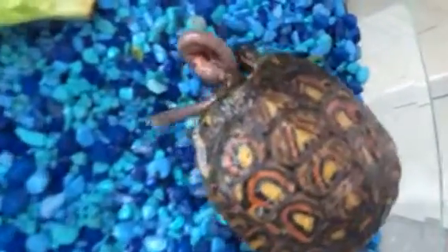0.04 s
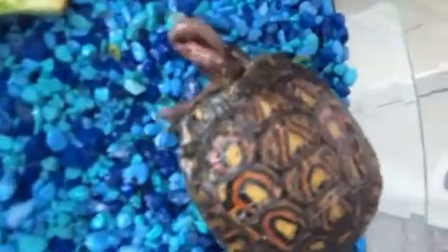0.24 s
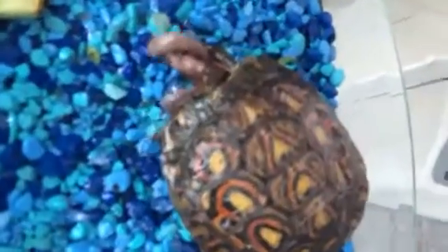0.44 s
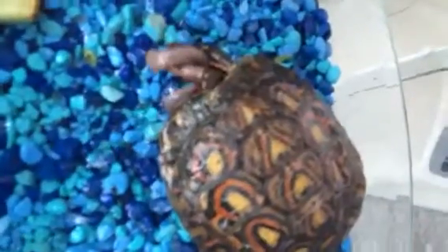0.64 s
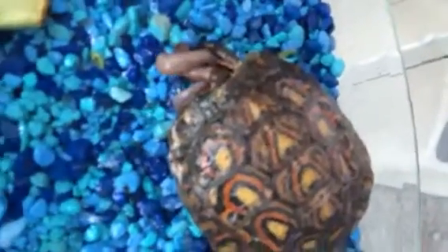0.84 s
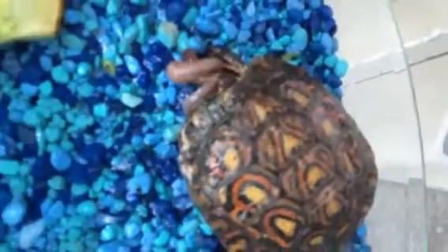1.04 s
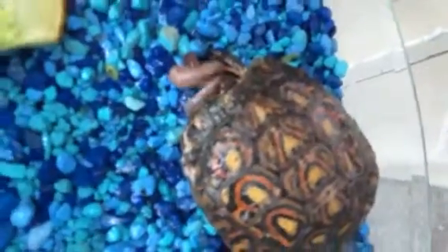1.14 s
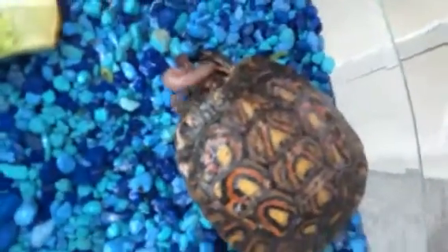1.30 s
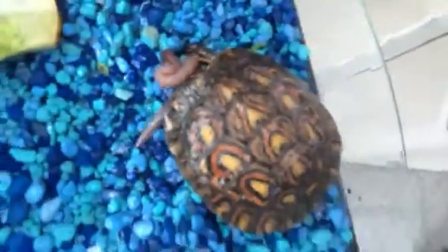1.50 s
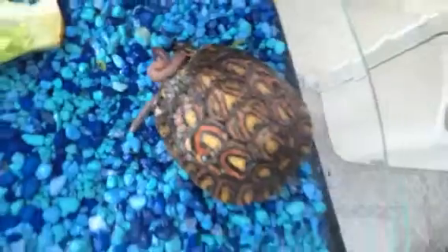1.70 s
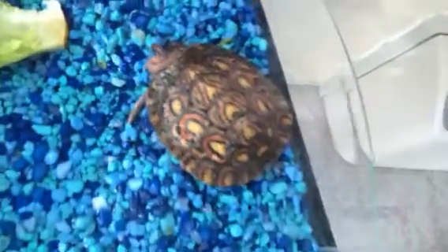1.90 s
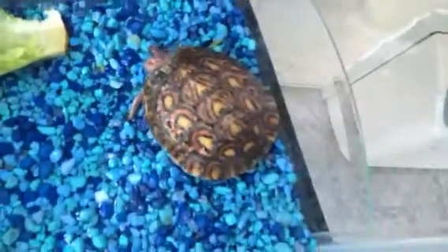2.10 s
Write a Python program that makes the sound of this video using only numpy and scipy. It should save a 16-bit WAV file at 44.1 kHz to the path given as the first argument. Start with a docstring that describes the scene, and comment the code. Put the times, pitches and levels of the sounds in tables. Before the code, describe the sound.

Gravel crunching and clicking under a turtle, with one hollow thump on a plastic tub.

```python
"""Turtle on gravel in a plastic tub

A turtle shifts on aquarium gravel while it tugs at a worm, heard from close by. Pebbles slide and click
in short crunches that excite the tub's walls. One strong impact of the shell, among a few faint ones,
sets the tub's low modes ringing like a drum. Soft swells of noise give a low opening ring of the tub,
faint rubs and hiss, and a late low thump, over the low rumble and faint hiss of a quiet room."""
import sys
import numpy as np
from scipy import signal
from scipy.fft import rfft, irfft
from scipy.io import wavfile

SR = 44100
rng = np.random.default_rng(int(sys.argv[2]) if len(sys.argv) > 2 else 0)


def log_audio(samples):
    """Write samples as a 16-bit WAV file to the path given in sys.argv[1]."""
    # one column per channel
    frames = np.atleast_2d(samples).T
    # limit to full scale, then quantise
    limited = np.clip(frames, -1, 1)
    pcm = np.round(limited * 32767).astype(np.int16)
    wavfile.write(sys.argv[1], SR, pcm)


N = 94815


def undb(db):
    """Amplitude ratio of a level in decibels."""
    return 10 ** (np.asarray(db) / 20)


def unit(x):
    """Normalisation to rms 1."""
    return x / np.sqrt(np.mean(x ** 2) + 1e-30)


def fade(t, t60):
    """Exponential damping from t = 0, by 60 dB in t60 seconds."""
    return (t >= 0) * np.exp(-np.log(1000) * np.maximum(t, 0) / t60)


def colour(x, points, tilt_db=0):
    """Spectral shaping by (frequency [Hz], level [dB]) points and a tilt per octave."""
    octave = np.log2(np.maximum(np.fft.rfftfreq(len(x), 1 / SR), 1))
    hz, db = np.array(points).T
    slope = tilt_db * np.maximum(octave - np.log2(hz[0]), 0)
    return irfft(rfft(x) * undb(np.interp(octave, np.log2(hz), db) + slope), len(x))


def band(size, hz, width):
    """Resonance driven by white noise, at rms 1."""
    detuning = 2 * (np.fft.rfftfreq(size, 1 / SR) - hz) / width
    return unit(irfft(rfft(rng.standard_normal(size)) / (1 + detuning ** 2), size))


def burst(x, envelope):
    """Amplitude modulation in which the envelope alone sets the energy."""
    return unit(x * envelope) * np.sqrt(np.mean(envelope ** 2))


def add(out, start, x):
    """Superposition of a short sound at its start time."""
    i = max(int(start * SR), 0)
    out[i:i + len(x)] += x[:max(N - i, 0)]


# spectrum of the room's rumble and hiss (frequency [Hz], relative density [dB])
ROOM_SPECTRUM = [(20, -34), (40, -7), (68, 2), (95, -2), (150, -3), (280, -8), (345, -16.5), (450, -25),
                 (720, -33.5), (1030, -26.5), (1300, -31.5), (1750, -30), (2700, -36), (4000, -35.5),
                 (7000, -39), (15000, -48.5)]
# drones in the room (frequency [Hz], bandwidth [Hz], level [dB])
ROOM_DRONES = [(120.64, 5.6, -58), (206.5, 12, -68), (250, 32, -67), (284.8, 14, -63.5), (520.3, 39, -74.5)]
def room():
    """Stationary noise: a broad rumble and faint hiss, with a few narrow droning bands."""
    air = undb(-52.5) * unit(colour(rng.standard_normal(N), ROOM_SPECTRUM))
    return air + sum(undb(db) * band(N, hz, width) for hz, width, db in ROOM_DRONES)


# soft swells of band noise (time [s], duration [s], frequency [Hz], bandwidth [Hz], level [dB])
NOISE_SWELLS = [(-0.03, 0.1, 267.3, 75, -41.5), (0.338, 0.082, 208, 60, -45.5),
                (0.344, 0.081, 508, 24, -50.5), (0.766, 0.11, 189, 134, -53), (0.776, 0.5, 6600, 5300, -71),
                (1.16, 0.15, 4470, 1200, -71), (1.267, 0.57, 1045, 88, -72.5),
                (1.503, .09, 5400, 900, -75.5), (1.916, 0.039, 110, 110, -52.5)]
def swells():
    """Modulated band noise: a low opening ring of the tub, faint rubs and hiss, and a late low thump."""
    t, out = np.arange(N) / SR, np.zeros(N)
    for start, length, hz, width, db in NOISE_SWELLS:
        swell = np.sin(np.pi * np.clip((t - start) / length, 0, 1))
        out += undb(db) * swell * band(N, hz, width)
    return out


# spectrum of grinding pebbles (frequency [Hz], relative density [dB])
GRIND_SPECTRUM = [(100, -9.5), (400, 1.5), (700, -6.5), (1000, 4.5), (1450, -4), (2000, 4), (2800, -5),
                  (3600, -2), (6000, 0.5), (8000, -1.5), (11000, -3), (15000, 2)]
# gravel sliding under feet and shell
# (time [s], rise time [s], time to release [s], level [dB], tilt [dB/octave], treble cutoff [Hz])
GRAVEL_SLIDES = [(0.0, 0.00067, .027, -47, 4, 14200), (0.097, 0.0025, 0.02, -53.5, -3.5, 9200),
                 (0.144, 0.0023, 0.035, -55.5, 1, 2780), (0.183, 0.0025, 0.014, -46.5, -3, 12900),
                 (0.205, 0.0019, 0.044, -50, -4.5, 13000), (0.247, 0.0034, 0.022, -49.5, -2, 12000),
                 (0.303, 0.015, 0.073, -57.5, -2.5, 9000), (0.361, 0.0025, 0.023, -55.5, -2.8, 11000),
                 (0.528, 0.0033, 0.037, -59, -4.5, 13000), (0.5404, 0.0009, 0.026, -53, -1.7, 11800),
                 (0.599, 0.0024, 0.019, -54.5, -3, 13000), (0.641, 0.0051, 0.052, -60, -1, 6500),
                 (0.694, 0.0024, 0.039, -46, 1, 6050), (0.741, 0.0023, 0.0099, -52, 1.5, 6440),
                 (1.933, 0.0084, 0.14, -61.5, -1.3, 10100), (2.034, 0.012, 0.049, -42.5, 0.5, 9300),
                 (2.075, 0.013, 0.057, -55.5, 1.8, 9000)]
def slides():
    """Shot noise: grinding pebbles make many tiny random contacts, each smeared by the close walls."""
    contacts_per_s, spread_db = 3000, 3.5
    smear_t60_s, release_s = 0.013, 0.005
    t, out = np.arange(SR // 5) / SR, np.zeros(N)
    for start, rise, length, db, tilt_db, cutoff_hz in GRAVEL_SLIDES:
        contacts = rng.random(len(t)) < contacts_per_s / SR
        strength = undb(spread_db * np.minimum(rng.exponential(size=len(t)), 3))
        # incoherent contacts add in power
        power = signal.fftconvolve((contacts * strength) ** 2, fade(t, smear_t60_s) ** 2)[:len(t)]
        grains = np.sqrt(np.abs(power)) * rng.standard_normal(len(t))
        grains = colour(grains, GRIND_SPECTRUM, tilt_db)
        grains = signal.sosfilt(signal.butter(2, cutoff_hz, fs=SR, output="sos"), grains)
        effort = np.minimum(t / rise, 1) * np.exp(-np.maximum(t - length, 0) / release_s)
        add(out, start, undb(db) * burst(grains, effort))
    return out


# spectrum of stone striking stone (frequency [Hz], relative density [dB])
STONE_SPECTRUM = [(100, -5.5), (400, 7.5), (700, -9.5), (1000, -2), (1450, 0.5), (2000, 11), (2800, -3),
                  (4000, 2.5), (6000, 7), (8000, 0.5), (11000, -3.5), (15000, -4.5)]
# pebble impacts (time [s], level [dB], ring frequency [Hz], relative ring level [dB], tilt [dB/octave])
PEBBLE_CLICKS = [(0.003, -34, 13500, -15, 30), (0.0142, -43.5, 10000, 5, -18),
                 (0.0628, -52.5, 990, 2, -5.5), (0.096, -45, 14500, -8.5, -3.5),
                 (0.1353, -46, 9400, -18, -0.5), (0.1678, -45.5, 4930, -7, -1.5),
                 (0.198, -48.5, 7850, 4, 24), (0.2021, -31.5, 3520, -11, -4.5), (0.2115, -47, 12700, -4, 6),
                 (0.2448, -29.5, 5800, -6, -10), (0.2519, -35.5, 9900, -2.5, 9),
                 (0.2891, -37, 5650, -31, 3), (0.3027, -33, 5630, 2.5, 0.3), (0.34, -36.5, 7800, -23, -6.5),
                 (0.367, -41.5, 2120, -2, -3), (0.5237, -53, 9000, -11, -2), (0.5956, -48.5, 11400, -4, 1),
                 (0.613, -46, 8000, -5, -13), (0.640, -36.5, 6030, -0.5, -0.1),
                 (0.6964, -42.5, 1790, -2.5, -3.5), (0.724, -44.5, 7900, -4, -26),
                 (0.7475, -46, 8000, -16, -1), (0.9228, -52, 2240, -17, -2), (1.9376, -52, 2000, -8, -4),
                 (2.011, -42.5, 4040, -1.5, 5.5), (2.041, -47.5, 7500, 8.5, 14), (2.06, -43, 6300, -10, 4),
                 (2.098, -57, 5360, 9, -5)]
def clicks():
    """Hard impact: a slipping pebble strikes its neighbours with a broadband crack and a damped ring."""
    t, out = np.arange(SR // 10) / SR, np.zeros(N)
    attack = np.minimum(t / 0.001, 1)
    for start, db, hz, ring_db, tilt_db in PEBBLE_CLICKS:
        stone = colour(rng.standard_normal(len(t)), STONE_SPECTRUM, tilt_db)
        crack = burst(stone, attack * fade(t, t60=0.026))
        ring = burst(band(len(t), hz, width=0.22 * hz), attack * fade(t, t60=0.024))
        add(out, start, undb(db) * (crack + undb(ring_db) * ring))
    return out


# modes of the tub's walls (frequency [Hz], relative level [dB], decay time T60 [s])
WALL_MODES = [(259.5, 3.5, 0.067), (530, 3, 0.28), (953, -3, 0.083), (1146, -3.5, 0.02), (1315, -0.5, 0.16),
              (1769, 0, 0.1), (1923, -2, 0.053), (2125, -3.5, 0.13), (3595, 2, 0.041)]
def enclosure(gravel):
    """Forced vibration and reverberation: the gravel rings the walls, and a short echo follows."""
    walls_db, echo_db = -19, -19
    t = np.arange(SR // 2) / SR
    walls = sum(undb(db) * unit(np.sin(2 * np.pi * hz * t) * fade(t, t60)) for hz, db, t60 in WALL_MODES)
    echo = unit(rng.standard_normal(len(t)) * fade(t, t60=0.25))
    impulse_response = (undb(walls_db) * walls + undb(echo_db) * echo) / np.sqrt(len(t))
    return gravel + signal.fftconvolve(gravel, impulse_response)[:N]


# low modes of the tub's floor (frequency [Hz], relative level [dB], decay time T60 [s])
FLOOR_MODES = [(149, -29, 0.11), (213, -8.5, 0.21), (253.8, -23.5, 0.5), (375, -24, 0.085),
               (524.7, -25.5, 0.089)]
# knocks of the shell on the tub (time [s], gain [dB])
SHELL_KNOCKS = [(0.1917, -29), (0.2026, -1.5), (0.338, -26), (0.727, -32), (2.054, -31)]
def knocks():
    """Free vibration after impact: the shell makes a dull thud, then the floor's modes boom and beat."""
    push_s = 0.00165
    t, out = np.arange(SR) / SR, np.zeros(N)
    # successive modes start in opposite phase
    modes = sum(-(-1) ** k * undb(db) * np.sin(2 * np.pi * hz * t) * fade(t, t60)
                for k, (hz, db, t60) in enumerate(FLOOR_MODES))
    boom = modes * (1 - np.exp(-t / push_s))
    thud = undb(-28) * band(SR, hz=1050, width=730) * fade(t, t60=0.023)
    for start, db in SHELL_KNOCKS:
        add(out, start, undb(db) * (boom + thud))
    return out


def scene():
    """Superposition: knocks, gravel, soft swells and room add at one microphone."""
    return (knocks() + enclosure(clicks() + slides()) + swells() + room())[None]


def record(dry):
    """Band limiting: the small microphone loses the deep bass, and the recorder cuts the top."""
    low_hz, top_hz = 52.7, 15100
    microphone = signal.butter(2, low_hz, "high", fs=SR, output="sos")
    recorder = signal.ellip(10, .2, 80, top_hz, fs=SR, output="sos")
    return signal.sosfilt(recorder, signal.sosfilt(microphone, dry))


dry = scene()
out = record(dry)
log_audio(out)
```